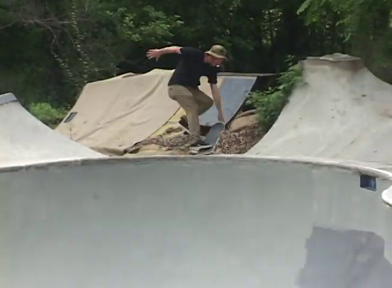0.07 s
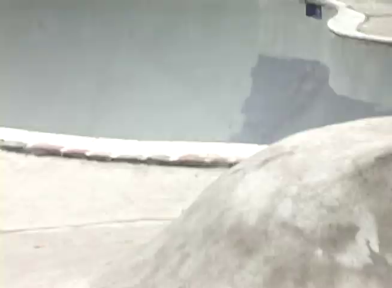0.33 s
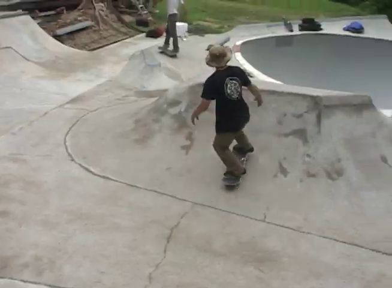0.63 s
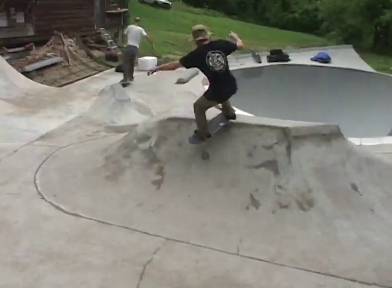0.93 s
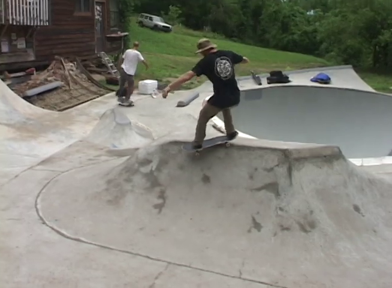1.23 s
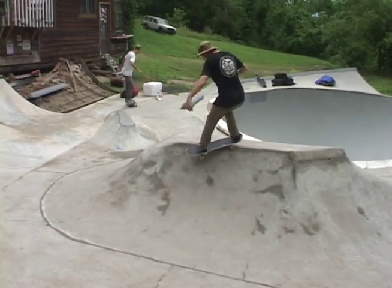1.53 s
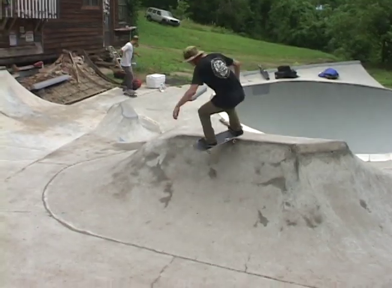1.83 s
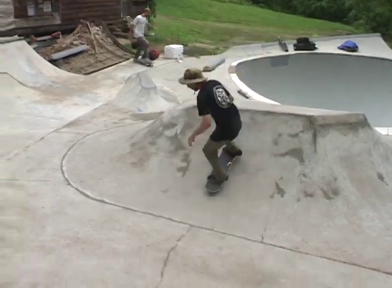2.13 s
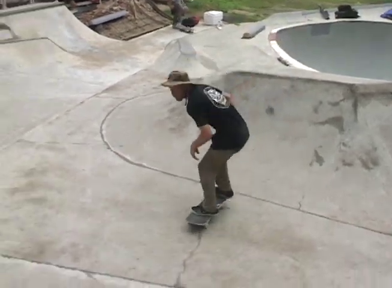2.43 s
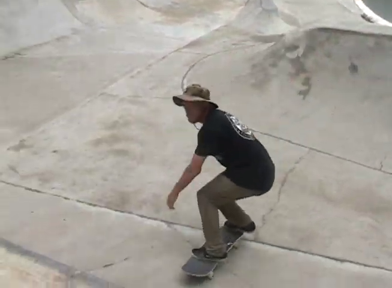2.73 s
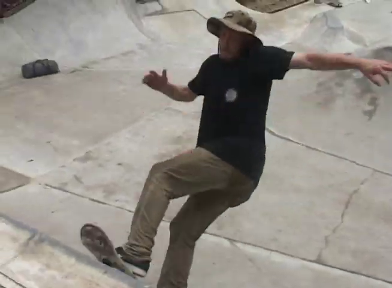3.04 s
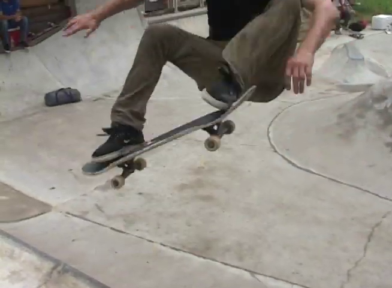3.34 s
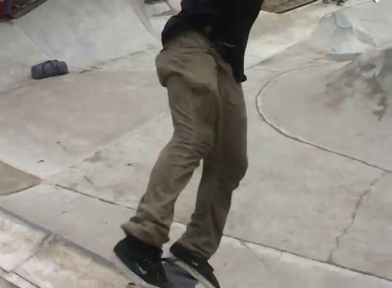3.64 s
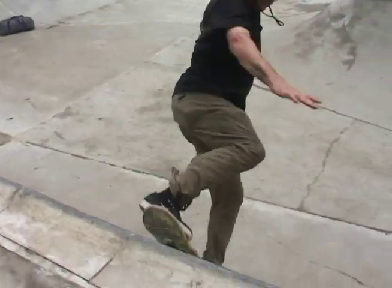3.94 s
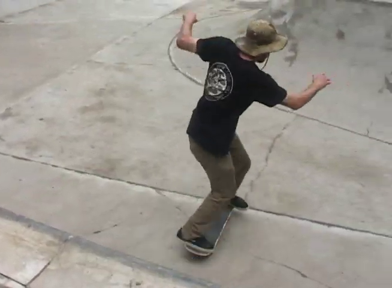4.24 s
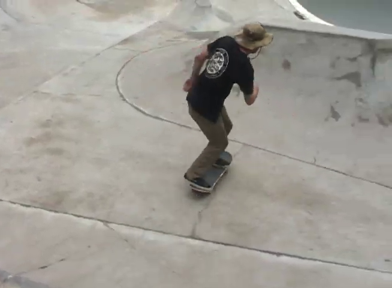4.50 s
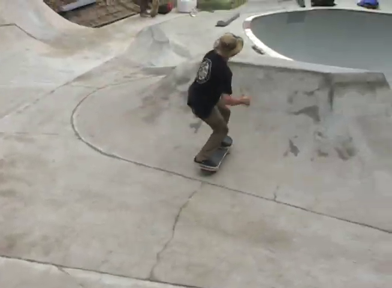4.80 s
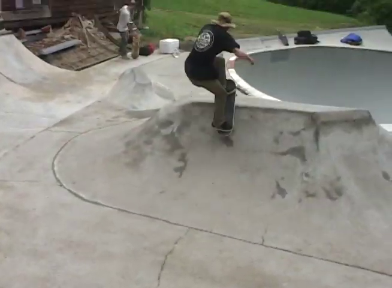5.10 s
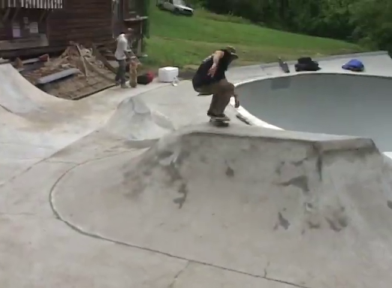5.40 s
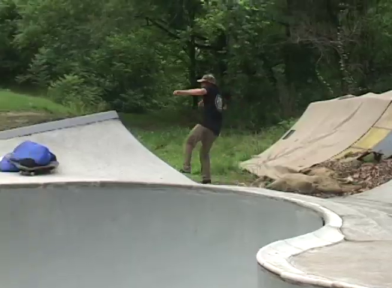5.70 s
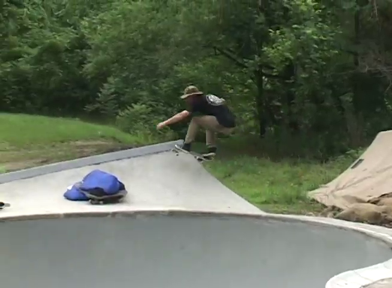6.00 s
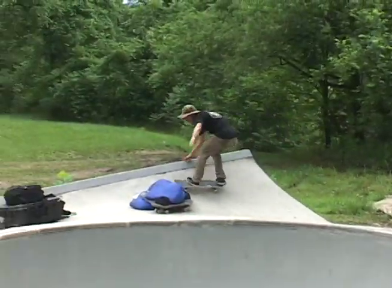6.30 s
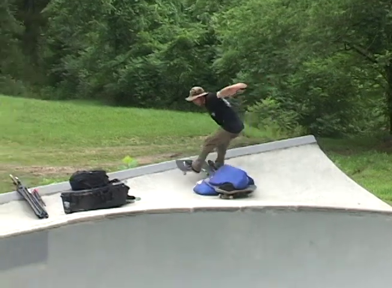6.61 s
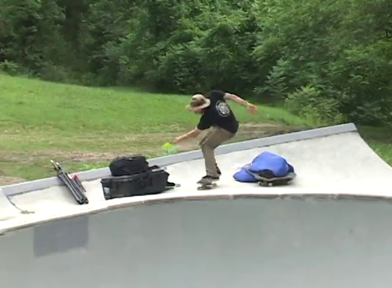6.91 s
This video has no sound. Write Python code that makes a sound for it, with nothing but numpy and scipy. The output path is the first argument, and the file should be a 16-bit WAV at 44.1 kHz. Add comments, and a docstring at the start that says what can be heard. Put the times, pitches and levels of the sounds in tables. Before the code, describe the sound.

A skateboard rolls over concrete with a rough, gritty drone that swells on a ramp. The rolling drops out for about a second of light clicks and knocks, then returns and grows closer. The board pops, hits with loud clacks and a short scrape right by the microphone, lands and rolls away. A few fainter knocks follow in the distance, over soft outdoor air and a faint insect buzz.

```python
"""Skateboard pass in a concrete park

A rider rolls off a ledge, up a bank, close by, pops an ollie into a short slide and rolls away.
Grit under the wheels makes the deck drone, most where a curved ramp presses the board down;
wheels knock, wood and trucks clack. Distance sets the hiss and the echo.
Insects buzz in the trees, and the hardest hits overload the microphone."""
import sys
import numpy as np
from scipy import signal
from scipy.fft import rfft, irfft, next_fast_len
from scipy.io import wavfile

SR = 44100
rng = np.random.default_rng(int(sys.argv[2]) if len(sys.argv) > 2 else 0)


def dump(signal):
    """Clip the signal to [-1, 1] and save it as 16-bit WAV at the path in sys.argv[1]."""
    limited = np.clip(np.atleast_2d(signal).T, -1, 1)
    pcm = np.round(limited * 32767).astype(np.int16)
    wavfile.write(sys.argv[1], SR, pcm)


N = 306550
TIME = np.arange(N) / SR
SETTLE_S, SNAP_S = 0.026, 0.0004  # attacks: wheels taking the rider's weight, a hard contact

# stretches of rolling: (touchdown [s], length [s], relative level [dB], release t60 [s])
ROLLS = [(0.489, 0.29, -4, 0.93), (2.089, 0.8, -3, 1), (3.867, 1.27, -2, 0.32), (5.78, 0.24, -24, 0.17),
         (6.274, 0.8, -18, 0.46)]
# hiss of sand and bearings: (frequency [Hz], relative level [dB])
HISS_SPECTRUM = [(1200, 5.5), (2700, 4.5), (3800, -1.5), (6500, -4.5), (9000, -4.5), (9700, -10.5),
                 (12000, -12.5), (14200, -23), (16000, -55)]


def rolling(lumps_db=2.5, lumps_hz=30, wander=0.045, wander_hz=7, whirr_sag=0.2, octaves_per_db=0.05):
    """Grit shakes deck and wheels; each layer swells with contact, ramp pressure and nearness."""
    # curved ramps pressing the wheels down: (centre [s], half length [s], load [dB], extra whirr [dB])
    ramps = [(0.73, 0.105, 10.5, 9.5), (2.262, 0.11, 3, 5.5), (2.82, 0.23, 3.5, -0.5),
             (3.973, 0.044, 2.5, 2), (4.287, 0.135, -0.5, 4), (4.938, 0.087, 3.5, 6)]
    # deck drone, wheel whirr and low growl, each: (frequency [Hz], relative level [dB])
    drone_spectrum = [(350, -28), (500, 8), (595, 7.5), (690, 4), (930, -70)]
    whirr_spectrum = [(480, -31), (690, 4.5), (920, 3.5), (1250, 0.5), (1700, -11.5), (3000, -85)]
    growl_spectrum = [(50, -48), (115, -2), (175, 10.5), (320, 9.5), (750, -37)]
    contact, near = sum(held(*roll, SETTLE_S) for roll in ROLLS), nearness()
    presses = np.array([np.exp(-((TIME - s) / half) ** 4) for s, half, *_ in ramps])
    load_db, whirr_db = np.transpose(ramps)[2:] @ presses
    lumps = amp(lumps_db * band(0, lumps_hz))
    grains = grit(per_s=7000, spread_db=2.0)
    drone = bend(colour(grains, drone_spectrum), 1 + wander * band(0, wander_hz))
    drone *= amp(-33.5 + 0.28 * near + load_db) * contact ** 0.72
    # the whirr sags in pitch when no ramp presses the wheels
    whirr = bend(colour(grains, whirr_spectrum), 1 - whirr_sag * (1 - presses.sum(0)))
    whirr *= amp(-32.5 + 0.66 * near + whirr_db) * contact
    # the growl climbs as the board closes in
    growl = bend(colour(grains, growl_spectrum), 2 ** (octaves_per_db * near))
    growl *= amp(-39.5 + 0.97 * near + load_db) * contact
    sand = colour(grit(per_s=3800, spread_db=2.5), HISS_SPECTRUM)
    sand *= amp(-36.5 + 0.44 * near + 0.4 * load_db) * contact
    return (drone + whirr + growl) * lumps + sand * np.sqrt(lumps)


def knocks(deck_db=4, thump_db=11, crack_db=2, bite_s=0.0036, lead_s=0.007, lead_db=-9):
    """Soft wheels set the deck ringing, the board thumps on its bushings and the hardware cracks."""
    # wheel knocks at joints and landings, and one slap of echo off a wall (5.445 s); levels relative:
    # (time [s], deck [dB], pitch [Hz], crack [dB], thump [dB])
    hits = [(0.298, -10.5, 587, -39, -36.5), (0.349, -22.5, 610, -31, -57), (0.517, -14, 610, -16.5, -25.5),
            (0.605, -14, 651, -18, -24.5), (0.779, -12.5, 593, -54, -28.5), (0.827, -20, 593, -52, -30),
            (1.176, -10, 694, -10, -28.5), (2.027, -16.5, 564, -16, -36), (2.042, -8, 602, -15.5, -37),
            (2.086, -3, 576, -7, -26.5), (2.333, -15, 854, -40, -32), (2.364, -11.5, 632, -20.5, -24),
            (2.702, -14.5, 556, -18.5, -24), (2.787, -17, 695, -19.5, -25.5),
            (3.7, -7.5, 565, -10.5, -21.5), (3.893, -8.5, 722, -4.5, -29), (4.018, -7.5, 742, -4.5, -56),
            (4.337, -8.5, 556, -20, -19.5), (4.429, -16.5, 613, -16, -39), (4.532, -12.5, 548, -48, -45),
            (5.138, -7.5, 530, -17, -54), (5.397, -4.5, 641, -16.5, -19), (5.445, -19.5, 567, -43, -35.5),
            (6.212, -16.5, 680, -14, -33.5), (6.245, -12.5, 600, -17.5, -44), (6.846, -22.5, 550, -16, -47)]
    # modes of deck and bushings for a hit pitched at 600 Hz: (frequency [Hz], relative level [dB])
    deck_modes = [(370, -17.5), (500, -7.5), (600, 5.5), (735, -3.5), (935, -1), (1080, -7.5), (1370, -8.5)]
    bushing_modes = [(158, 0.21), (270, 0.79)]
    # crack of the hardware: (frequency [Hz], relative level [dB])
    crack_spectrum = [(200, 4), (1400, 4.5), (6200, -7), (11000, -13), (16500, -39)]
    out, t = np.zeros(N), np.arange(SR // 5) / SR
    for s, db, hz, crack, thump in hits:
        pitch = hz / 600
        # the rider's weight detunes the deck anew for every blow
        deck, first_wheel = (ring(t, deck_modes, t60=0.043, rise_s=0.0012, pitch=pitch, detune=0.02)
                             for _ in range(2))
        bushings = ring(t, bushing_modes, t60=0.06, rise_s=0.0078, pitch=pitch)
        hardware = burst(t, crack_spectrum, t60=0.027, hold_s=0.0013) * (1 - np.exp(-t / bite_s))
        add(out, s, amp(db + deck_db) * deck)
        add(out, s, amp(thump + thump_db) * bushings)
        add(out, s, amp(crack + crack_db) * hardware)
        # a rolling board meets a joint at an angle, so one wheel touches lightly first
        if any(start < s < start + length for start, length, *_ in ROLLS):
            add(out, s - lead_s, amp(db + deck_db + lead_db) * first_wheel)
    return out


def clacks(snap_db=-5, wood_db=-11, metal_db=1):
    """Hard contacts give a bright snap, a duller wooden tail and a ping of the trucks."""
    # tail, nose and trucks on concrete or shoes: (time [s], relative level [dB], emphasis [Hz])
    hits = [(0.198, -31, 990), (0.291, -27, 1000), (0.295, -17, 3430), (0.657, -23, 7700),
            (1.069, -25.5, 994), (1.098, -20, 914), (1.126, -22.5, 936), (1.146, -30, 2030),
            (1.404, -27, 1120), (1.889, -26.5, 1090), (2.491, -23, 1590), (3.1502, -12.5, 3430),
            (3.192, -12.5, 2060), (3.195, -13.5, 4112), (3.438, -27.5, 2780), (3.619, -12.5, 3900),
            (3.6801, -6.5, 2510), (3.6889, -7.5, 1580), (3.7857, -17.5, 4050), (3.831, -19, 8900),
            (3.9066, -8.5, 3020), (4.5311, -15.5, 1390), (4.6271, -12, 2900), (5.402, -8.5, 960),
            (5.415, -18, 1650), (6.669, -28.5, 2860), (6.834, -21.5, 1224)]
    # modes of the metal trucks: (frequency [Hz], relative level [dB])
    truck_modes = [(1480, 7), (2240, 5), (2650, 3.5), (3434, 0.5), (4009, 4.5), (5043, 6.5)]
    out, t = np.zeros(N), np.arange(SR // 5) / SR
    for s, db, spot_hz in hits:
        snap = burst(t, wood_at(spot_hz), t60=0.029, hold_s=0.003)
        wood = burst(t, wood_at(spot_hz), t60=0.099, tilt_db=-5)
        struck_modes = [(hz, level + focus(hz, spot_hz)) for hz, level in truck_modes]
        metal = ring(t, struck_modes, t60=0.022, rise_s=SNAP_S)
        add(out, s, amp(db) * (amp(snap_db) * snap + amp(wood_db) * wood + amp(metal_db) * metal))
    return out


def booms(peak_skew=0.6):
    """The loaded board bounces on its bushings with one hollow note that swells and is damped."""
    # drops over slab joints: (time [s], length [s], level [dB], pitch [Hz])
    drops = [(0.51, 0.034, -22.5, 177), (2.782, 0.023, -13.5, 214), (4.724, 0.066, -25, 154.2),
             (4.82, 0.052, -21.5, 169.5)]
    out = np.zeros(N)
    for s, length, db, hz in drops:
        t = np.arange(0, length, 1 / SR)
        swell = np.sin(np.pi * (t / length) ** peak_skew) ** 2
        add(out, s, amp(db) * swell * np.sin(2 * np.pi * hz * t))
    return out


def scrapes(release_t60=0.14):
    """Wood and urethane slide over concrete in a crackling rasp that fades as the weight comes off."""
    # slides: (start [s], length [s], level [dB], emphasis [Hz])
    slides = [(0.311, 0.055, -36.5, 3300), (1.398, 0.048, -36.5, 1280), (1.857, 0.046, -40.5, 6900),
              (2.81, 0.22, -39, 2880), (3.69, 0.098, -22, 2620), (3.79, 0.13, -36.5, 4360),
              (6.248, 0.042, -26, 4900), (6.764, 0.041, -43.5, 7760)]
    rasp = grit(per_s=30000, spread_db=1.5) * amp(2.5 * band(0, 110))
    out = np.zeros(N)
    for s, length, db, spot_hz in slides:
        stroke = rasp[round(s * SR):][:SR // 2]
        t = np.arange(len(stroke)) / SR
        envelope = np.minimum(t / SETTLE_S, 1) * amp(db - 60 * np.maximum(t - length, 0) / release_t60)
        add(out, s, envelope * colour(stroke, wood_at(spot_hz), tilt_db=4 * np.log2(spot_hz / 3000)))
    return out


def squeals(jitter=0.069):
    """Urethane sticks and slips so fast that it gives a short, unsteady tone."""
    # sideways skids: (start [s], length [s], level [dB], first pitch [Hz], last pitch [Hz])
    skids = [(0.861, 0.098, -36, 588, 548), (2.175, 0.028, -17, 630, 577),
             (4.504, 0.0165, -23.5, 1190, 1680), (6.265, 0.048, -27, 598, 561)]
    out, waver = np.zeros(N), 1 + jitter * band(0, 170)
    for s, length, db, first_hz, last_hz in skids:
        unsteady = waver[round(s * SR):round((s + length) * SR)]
        hz = np.linspace(first_hz, last_hz, len(unsteady)) * unsteady
        tone = np.sin(2 * np.pi * np.cumsum(hz) / SR)
        add(out, s, amp(db) * tone * signal.windows.tukey(len(hz), .5))
    return out


def bearings(song_db=-51.5, hiss_db=-51, coast_t60=48.0, chatter_db=4.5, chatter_hz=14):
    """The bearings sing while the wheels turn and coast on after they leave the ground."""
    # spinning wheels and bearings: (centre [Hz], width [Hz], relative level [dB])
    resonances = [(1005, 124, -2), (5300, 1100, -1.5), (8500, 520, -11), (11000, 1100, -13)]
    spin = np.max([held(s, length, db, coast_t60, SETTLE_S) for s, length, db, _ in ROLLS], 0)
    song = sum(amp(db + chatter_db * band(0, chatter_hz)) * band(hz, width)
               for hz, width, db in resonances)
    hiss = colour(rng.standard_normal(N), HISS_SPECTRUM, tilt_db=0.5)
    return spin * amp(nearness()) * (amp(song_db) * song + amp(hiss_db) * hiss)


def echo(x, taps_per_s=2500, delay_s=0.00089, build_s=0.016, smear_s=0.00011):
    """Scattered reflections from ramps and trees, smeared in pitch because the board is moving."""
    # decay of the park, longest in the mids: (frequency [Hz], t60 [s])
    decay = [(100, 0.13), (1400, 0.58), (4000, 0.52), (16000, 0.49)]
    # tone of the reflections: (frequency [Hz], relative level [dB])
    tone = [(100, 16.0), (600, 5), (1800, 6.4), (4000, 4), (14000, 3.4)]
    taps = rng.choice([-1., 1.], SR) * (rng.random(SR) < taps_per_s / SR)
    hz, t, spectra = signal.stft(taps, SR, nperseg=256)
    onset = np.clip((t - delay_s) / build_s, 0, 1)
    fade = amp(read(tone, hz)[:, None] - 60 * t / read(decay, hz)[:, None])
    tail = signal.istft(spectra * onset * fade, SR, nperseg=256)[1]
    wet = signal.fftconvolve(x, tail / np.linalg.norm(tail))[:N]
    return np.interp(TIME + smear_s * band(0, 60), TIME, wet)


def gust():
    """Wind rumbles on the microphone as the rider passes."""
    return held(start=2.82, length=0.9, db=-43.5, t60=4.7, rise_s=0.16) * band(hz=45, width_hz=52)


def insects(buzz_db=-61.5, chirp_db=-64.5, flutter_db=5.5):
    """A chorus buzzes in the trees; one insect flutters just below it in pitch."""
    chirps = band(hz=5190, width_hz=70) * amp(flutter_db * band(0, 8.6))
    return amp(chirp_db) * chirps + amp(buzz_db) * band(hz=5590, width_hz=140)


def air(db=-48.5):
    """Still outdoor air lays a soft, dark bed of noise."""
    # open air: (frequency [Hz], relative level [dB])
    spectrum = [(20, -12), (60, -4), (130, -9), (560, -6), (2000, -16.5), (5500, -22), (12500, -36),
                (16000, -52)]
    return amp(db) * colour(rng.standard_normal(N), spectrum)


def nearness(reference_m=5):
    """Gain in dB of the board's direct sound over that at the reference distance."""
    # the board's path: (time [s], distance from the microphone [m])
    path = [(0.3, 38), (0.6, 6.14), (2.0, 6.64), (3.1, 2.33), (3.9, 2.58), (5.1, 6.5), (5.8, 23), (6.9, 16)]
    metres = np.interp(TIME, *np.transpose(path))
    return 20 * np.log10(reference_m / np.maximum(metres, 1))


def wood_at(spot_hz):
    """The spectrum of the deck when touched at a spot that favours spot_hz."""
    # struck wood: (frequency [Hz], relative level [dB])
    spectrum = [(100, 4), (1450, 13), (2600, 7.5), (6100, 1), (9000, -3.5), (12000, -14), (16000, -30)]
    hz = np.geomspace(50, SR / 2, 80)
    return np.transpose([hz, read(spectrum, hz) + focus(hz, spot_hz)])


def focus(hz, spot_hz, boost_db=7, width_octaves=0.4):
    """Bell boost in dB of the range that the touched spot favours."""
    return boost_db * np.exp(-(np.log2((hz + 1) / spot_hz) / width_octaves) ** 2)


def grit(per_s, spread_db):
    """Tiny impacts on sand grains: many small, a few large."""
    size = amp(spread_db * np.minimum(rng.exponential(1, N), 5))
    return size * rng.choice([-1, 1], N) * (rng.random(N) < per_s / SR)


def burst(t, spectrum, t60, hold_s=0, tilt_db=0):
    """A rattle of contacts that starts at once, holds and dies away."""
    fade = amp(-60 * np.maximum(t - hold_s, 0) / t60)
    return colour(rng.choice([-1., 1.], len(t)), spectrum, tilt_db) * fade * (1 - np.exp(-t / SNAP_S))


def ring(t, modes, t60, rise_s, pitch=1, detune=0):
    """Dying sines that swell while the contact lasts."""
    wave = np.zeros(len(t))
    for hz, db in modes:
        tuned_hz = hz * pitch * (1 + detune * rng.standard_normal())
        wave += amp(db) * np.sin(2 * np.pi * (tuned_hz * t + rng.random()))
    wave *= amp(-60 * t / t60)
    return wave / abs(wave).max() * (1 - np.exp(-t / rise_s))


def band(hz, width_hz):
    """Noise in one bell-shaped band, at rms 1; around 0 Hz it is a slow random wander."""
    size = next_fast_len(N)
    bell = np.exp(-.5 * ((np.fft.rfftfreq(size, 1 / SR) - hz) / width_hz) ** 2)
    return unit(irfft(rfft(rng.standard_normal(size)) * bell, size)[:N])


def colour(x, spectrum, tilt_db=0):
    """Gives x a spectrum, tilted per octave above about 1 kHz, at rms 1."""
    hz = np.fft.rfftfreq(len(x), 1 / SR)
    gain = amp(read(spectrum, hz) + tilt_db * np.log2(1 + hz / 1000))
    return unit(irfft(rfft(x) * gain, len(x)))


def bend(x, ratio):
    """Moves every resonance of x along a curve of pitch ratios."""
    return np.interp(np.cumsum(ratio), np.arange(N), x, period=N)


def held(start, length, db, t60, rise_s):
    """An envelope: attack, hold, release."""
    attack = np.clip((TIME - start) / rise_s, 0, 1)
    return attack * amp(db - 60 * np.maximum(TIME - start - length, 0) / t60)


def add(mix, s, sound):
    """Adds a sound to the mix at time s."""
    part = mix[max(round(s * SR), 0):][:len(sound)]
    part += sound[:len(part)]


def read(points, hz):
    """Reads a table on a log-frequency axis."""
    f, value = np.transpose(points)
    return np.interp(np.log(hz + 1), np.log(f + 1), value)


def amp(db):
    """Decibels to gain."""
    return 10 ** (np.asarray(db) / 20)


def unit(x):
    """Scales x to rms 1."""
    return x / np.sqrt(np.mean(x ** 2) + 1e-20)


def scene(send_db=-20, low_cut_hz=60):
    """The board, with its deepest bass cut away, in the open air; its echo share grows with distance."""
    board = rolling() + bearings() + knocks() + booms() + clacks() + scrapes() + squeals()
    board = signal.lfilter(*signal.butter(1, low_cut_hz, "high", fs=SR), board)
    reflections = echo(board * amp(send_db - nearness()))
    return (board + reflections + air() + insects() + gust())[None]


def record(dry):
    """The input stage clips the hardest hits; a steep low-pass trims the top."""
    ceiling, cutoff_hz = 0.305, 16200
    clipped = dry / (1 + (dry / ceiling) ** 8) ** (1 / 8)
    low_pass = signal.firwin(255, cutoff_hz, window=("kaiser", 9), fs=SR)
    return signal.oaconvolve(clipped, low_pass[None], "same")


dry = scene()
out = record(dry)
dump(out)
```